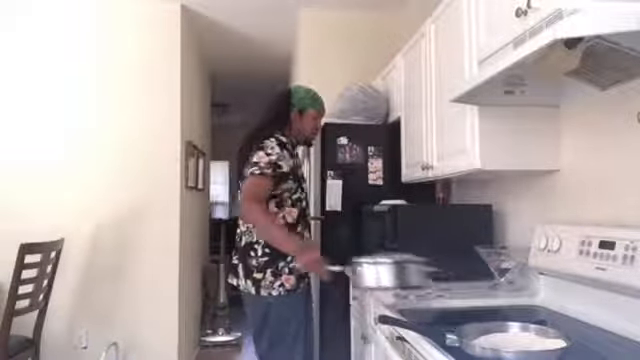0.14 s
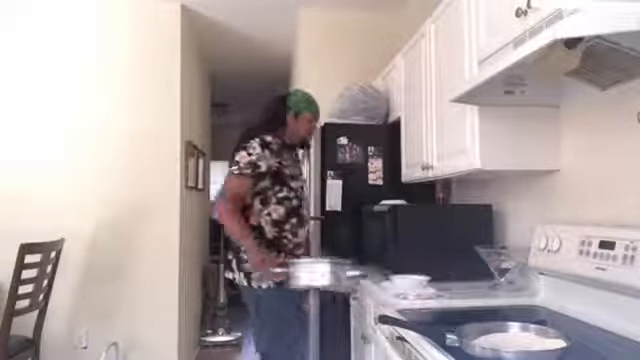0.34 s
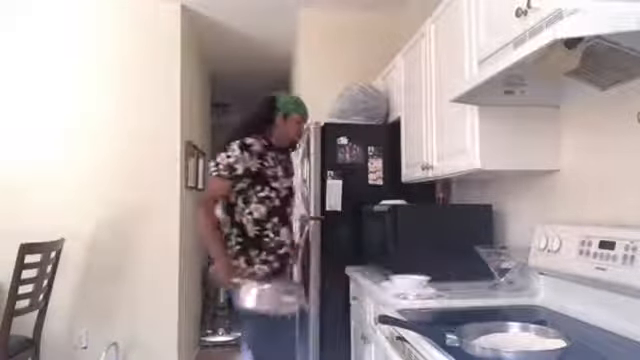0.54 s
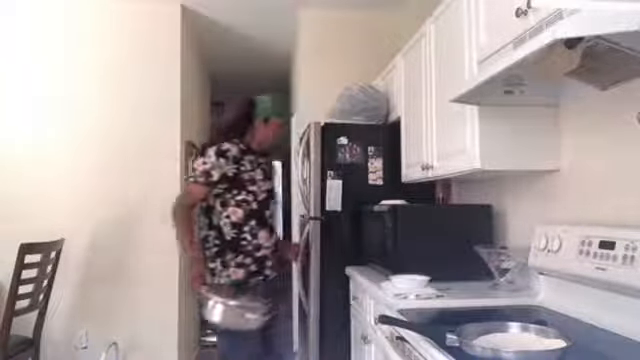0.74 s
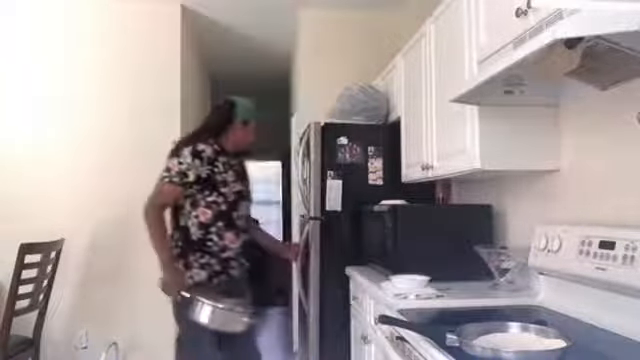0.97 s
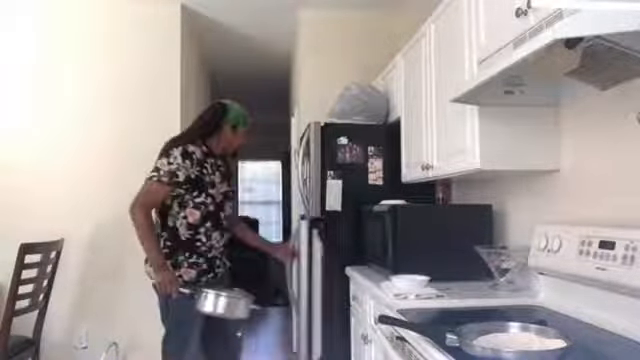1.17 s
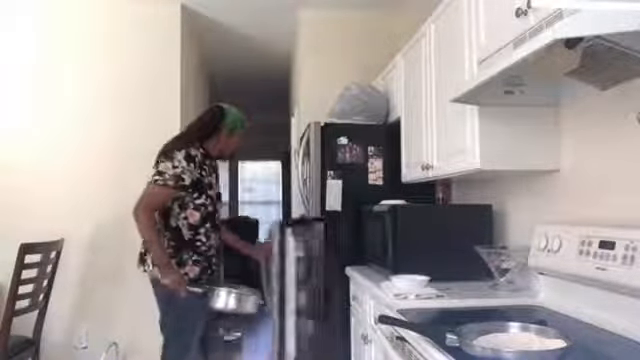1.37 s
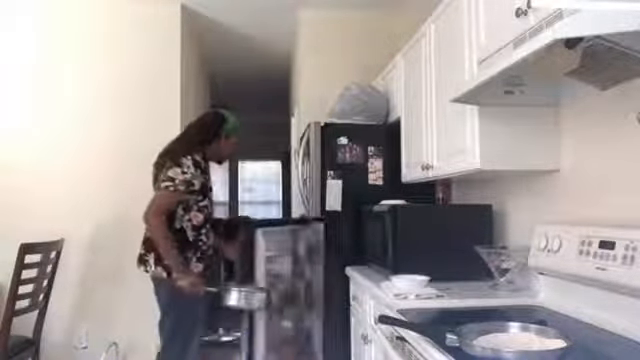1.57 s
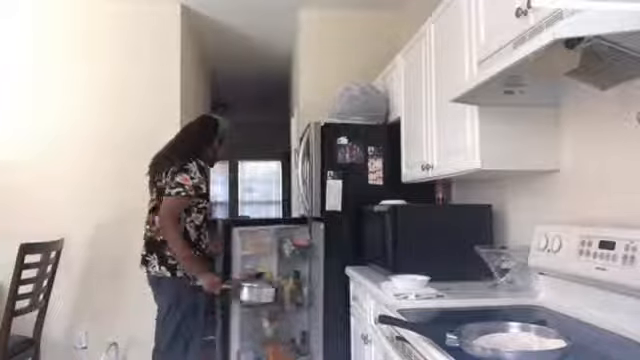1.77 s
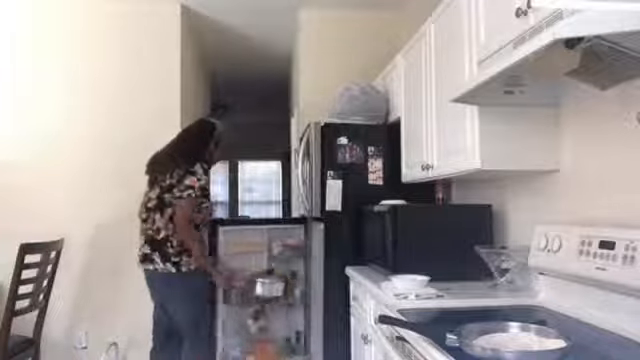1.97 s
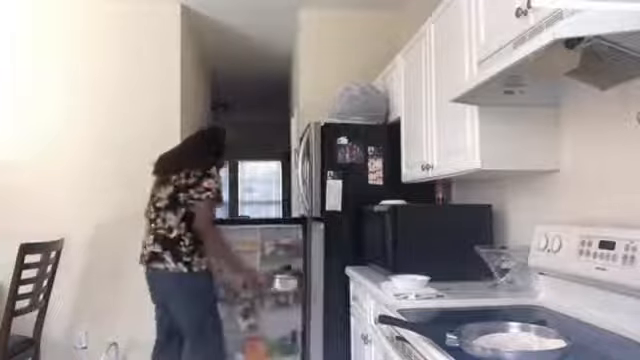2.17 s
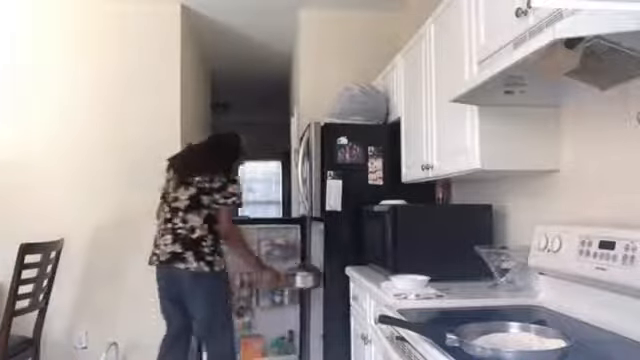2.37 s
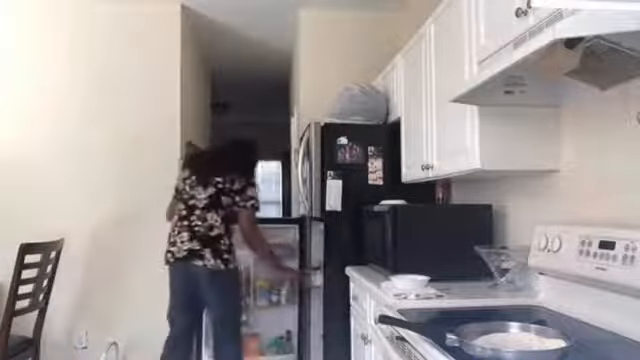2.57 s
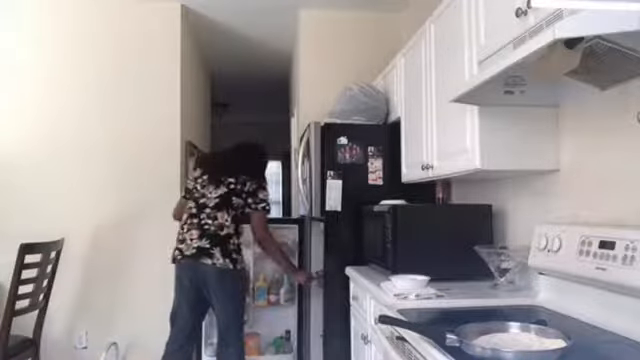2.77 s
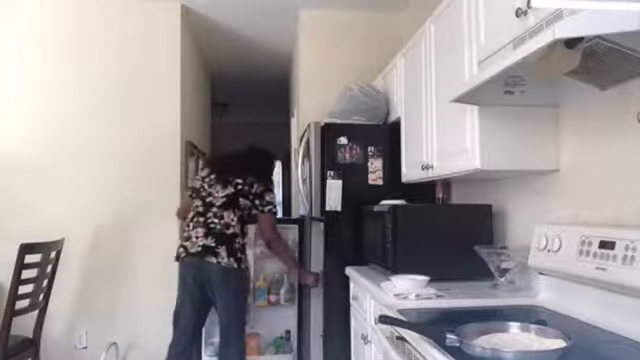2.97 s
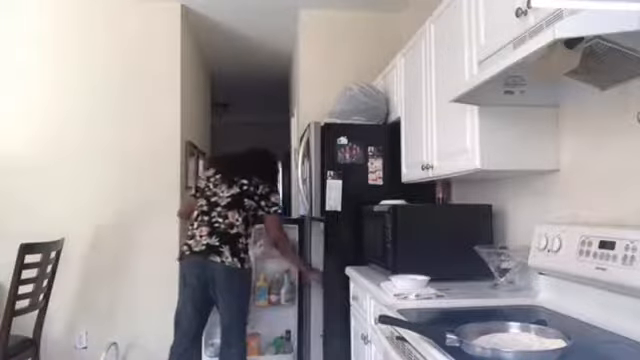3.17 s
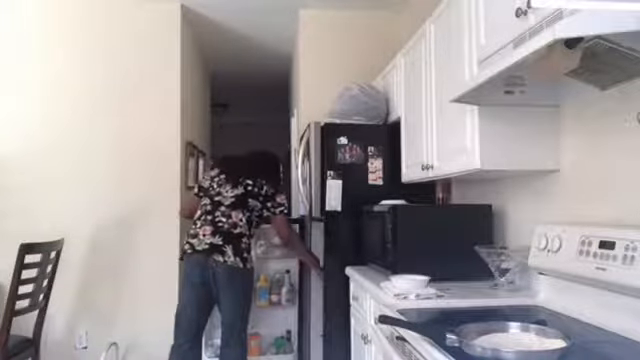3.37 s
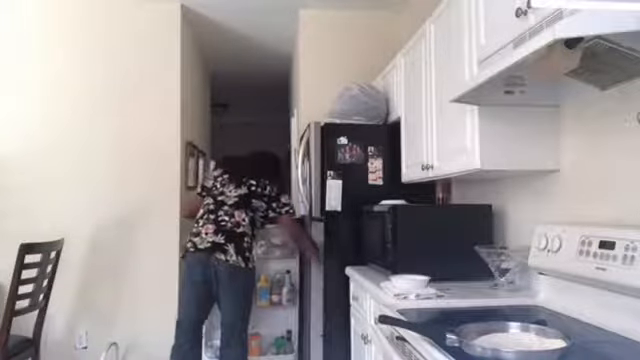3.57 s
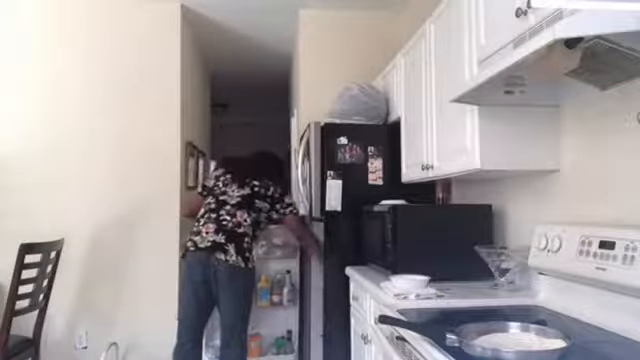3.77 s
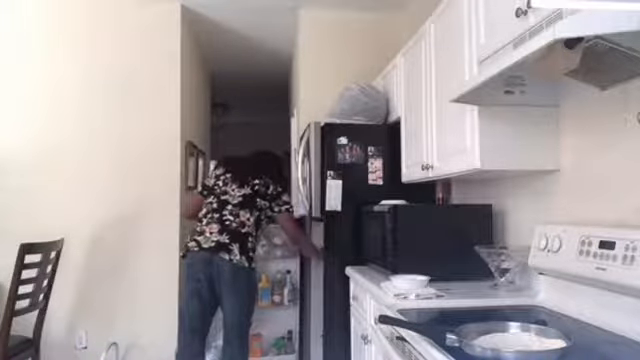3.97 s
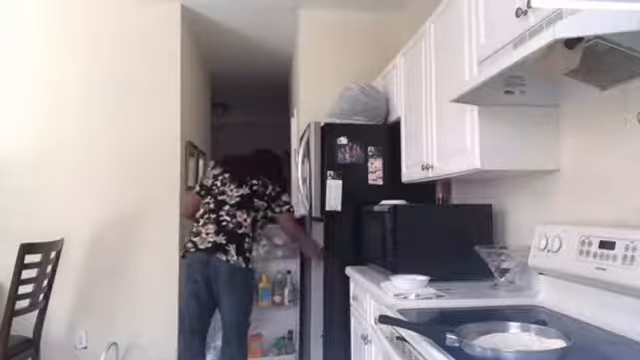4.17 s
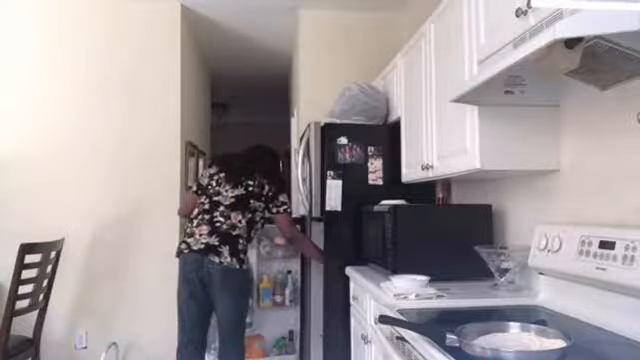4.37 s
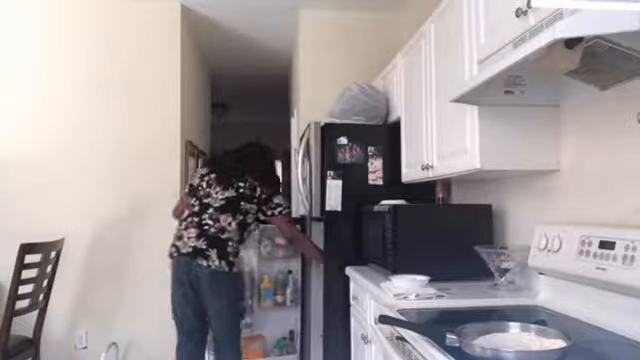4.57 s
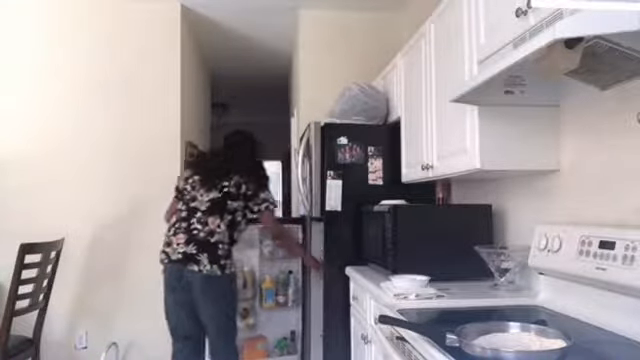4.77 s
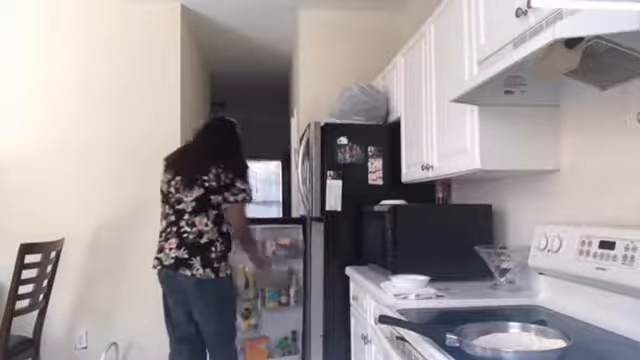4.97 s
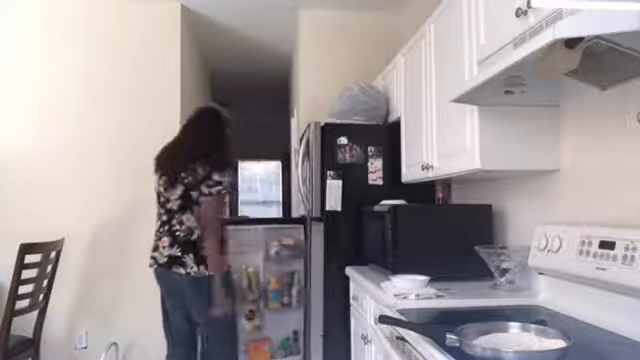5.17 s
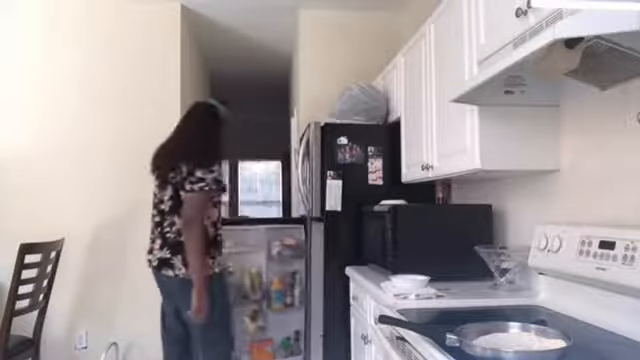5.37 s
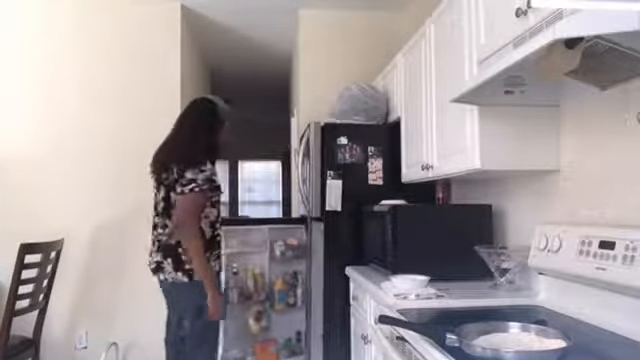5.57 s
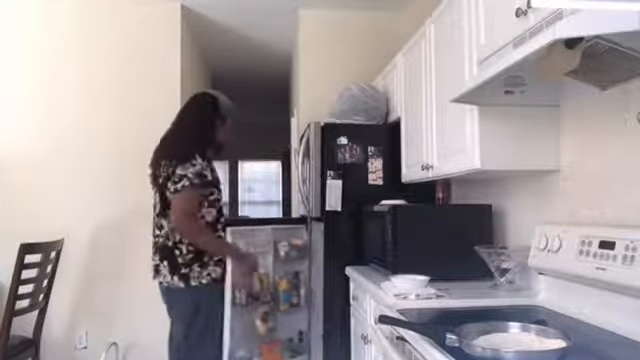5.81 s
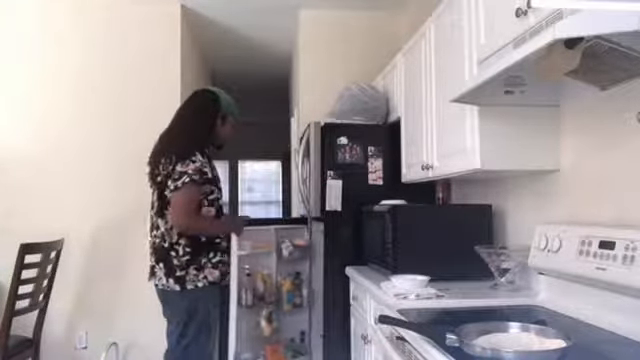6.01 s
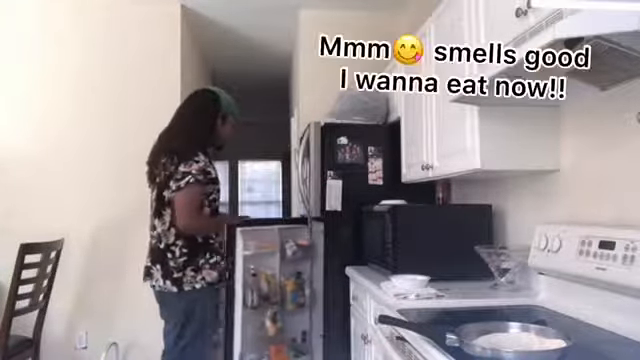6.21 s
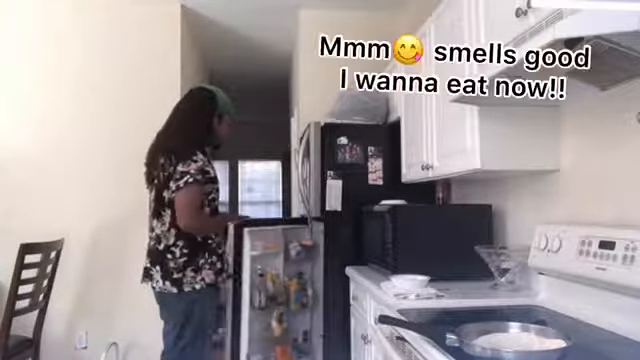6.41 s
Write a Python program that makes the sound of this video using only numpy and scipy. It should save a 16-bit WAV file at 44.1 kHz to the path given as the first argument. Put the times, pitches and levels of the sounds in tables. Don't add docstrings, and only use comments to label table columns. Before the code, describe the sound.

A lively home kitchen opening onto a hallway, heard by one fixed microphone at some distance. A quiet, low fridge hum slowly beats over soft fan noise and faint hiss throughout. From 0 to 1 s slippers scuff, with soft treads near 0.4 and 0.8-0.9. At about 1.1 s the fridge door pops off its seal in a tight run of snaps with a dull panel thump. Gritty shuffles follow from 1.2 to 2.3 s, with a step near 2.05 and a small dry tick at 2.8. From 3.46 to 3.65 s a metal pot knocks a shelf, hollow with short rim raps, then rocks in softer touches until 3.8, with a low boom. A step and scuff come near 4.4. At 4.67 s a glass lid lands with a loud bright clink, clinks again at 4.76 and shivers to rest. Shuffling resumes around 5.1-5.7 s, then a light step at 5.9 and fading scuffs.

```python
import sys
import numpy as np
from scipy import signal
from scipy.fft import rfft, irfft, next_fast_len
from scipy.io import wavfile
from scipy.ndimage import uniform_filter1d, map_coordinates

SR = 44100
rng = np.random.default_rng(int(sys.argv[2]) if len(sys.argv) > 2 else 0)


def natural_amplitude(level_db):
    exponent = np.asarray(level_db, float) / 20
    return 10 ** exponent


def digitize_waveform(pressure):
    field = np.atleast_2d(pressure).T
    bounded = np.clip(field, -1, 1)
    quanta = np.round(bounded * 32767).astype(np.int16)
    wavfile.write(sys.argv[1], SR, quanta)


N = 284174


def unit(x):
    return x / np.sqrt(np.mean(x ** 2) + 1e-20)


def along(points, hz):
    f, v = np.transpose(points)
    return np.interp(np.log(hz + 1), np.log(f + 1), v)


def wobble(rate):
    coarse = np.arange(0, N + 16, 16)
    knots = rng.standard_normal(int(N * rate / SR) + 4)
    curve = map_coordinates(knots, [coarse * rate / SR])
    return np.interp(np.arange(N), coarse, curve)


def soft_step(t, at):
    return 1 / (1 + np.exp(np.clip((at - t) / 0.0012, -50, 50)))


def coloured(x, points, tilt_db=0):
    m = next_fast_len(len(x) + 8192)
    hz = np.fft.rfftfreq(m, 1 / SR)
    gain = natural_amplitude(along(points, hz) + tilt_db * np.log2((hz + 20) / 1000))
    return unit(irfft(rfft(x, m) * gain, m)[:len(x)])


def patchy(depth_db, size, wide, long):
    z = signal.stft(rng.standard_normal(N), nperseg=size)[2]
    field = rng.standard_normal(z.shape)
    field = uniform_filter1d(field, wide, 0)
    field = uniform_filter1d(field, long, 1)
    return signal.istft(z * natural_amplitude(depth_db * unit(field)), nperseg=size)[1][:N]


# f/Hz, t60/s
KITCHEN_T60 = [(100, 0.5), (500, 0.64), (2000, 0.52), (6000, 0.46), (14000, 0.17)]
# f/Hz, level/dB
HALL_LEVEL = [(300, -23), (1000, -16), (3000, -14.5)]


def in_room(x, wet_db):
    hall_longer = 2.77
    hz, t, z = signal.stft(rng.standard_normal(SR * 3 // 5), SR, nperseg=256)
    t60 = along(KITCHEN_T60, hz)[:, None]
    kitchen = natural_amplitude(-60 * t / t60)
    hall = natural_amplitude(along(HALL_LEVEL, hz)[:, None] - 60 * t / (hall_longer * t60))
    tail = signal.istft(z * (kitchen + hall), SR, nperseg=256)[1]
    delayed = np.pad(x, (220, 0))
    wet = signal.fftconvolve(delayed, tail / np.linalg.norm(tail))
    return np.pad(x, (0, len(wet) - len(x))) + natural_amplitude(wet_db) * wet


def add(track, s, x):
    part = track[round(s * SR):][:len(x)]
    part += x[:len(part)]


def ring(modes, t, scatter_db):
    total = 0
    for hz, db, t60 in modes:
        envelope = natural_amplitude(db + scatter_db * rng.normal() - 60 * t / t60)
        total = total + envelope * np.sin(2 * np.pi * hz * t)
    return total


def knocks(contacts, body, modes, wet_db, attack):
    track = np.zeros(N)
    t = np.arange(SR // 3) / SR
    for s, db, tilt_db, t60, ring_db in contacts:
        burst = coloured(rng.standard_normal(len(t)), body, tilt_db) * natural_amplitude(-60 * t / t60)
        blow = burst + natural_amplitude(ring_db) * ring(modes, t, 2.3)
        blow = blow * (1 - np.exp(-t / attack))
        add(track, s, in_room(natural_amplitude(db - 4.5) * blow, wet_db))
    return track


# f/Hz, level/dB per Hz
AIR_SPECTRUM = [(20, -61), (40, -16), (80, -4), (150, -3), (350, -6), (470, -10.5), (880, -17),
                (1300, -19.5), (2200, -27), (3500, -36), (7000, -38.5), (11000, -51.5), (15700, -53)]
# f/Hz, f/Hz, level/dB rms each, t/s of a cancellation
BEATING_PAIRS = [
    (117.55, 120.03, -53.2, 3.35),
    (56.76, 59.3, -68, 3.21),
]
# f/Hz, level/dB rms
MOTOR_TONES = [(75.7, -77), (113.5, -63.5), (116, -88), (136.45, -63), (177.5, -65), (296.55, -64.5),
               (355.8, -64), (592.2, -76.5), (764.4, -69.5), (882.9, -79), (969, -72.5), (3348, -81.5),
               (4298, -83), (5464, -87.5)]


def fridge():
    t = np.arange(N) / SR
    tones = np.zeros(N)
    for a, b, db, null in BEATING_PAIRS:
        first = np.sin(2 * np.pi * a * (t - null))
        second = np.sin(2 * np.pi * b * (t - null))
        tones += natural_amplitude(db) * (first - second)
    for hz, db in MOTOR_TONES:
        level = natural_amplitude(db + 1.4 * wobble(3))
        tones += level * np.sin(2 * np.pi * hz * t + 0.4 * wobble(3))
    fan = coloured(patchy(1.2, size=512, wide=6, long=8), AIR_SPECTRUM)
    return np.sqrt(2) * tones + natural_amplitude(-53 + 0.88 * wobble(3.33)) * fan


# f/Hz, level/dB
SOLE_LOW_COLOUR = [(500, -48), (1000, -9.5), (1600, 0), (2100, 0), (2700, -2.5), (3500, -9.5), (5000, -16),
                   (8000, -33), (15700, -38)]
SOLE_HIGH_COLOUR = [(500, -29), (1200, -4), (2300, -4.5), (3500, 2.5), (5000, -4), (7000, -15),
                    (15700, -48.5)]
FIZZ_COLOUR = [(4000, -24), (7000, 2.5), (11000, -7.5), (15700, -10)]
DRAG_T60 = (.55, 0.51, 0.38)
# t/s, length/s, peak level/dB, pitch from low 0 to high 1, fizz level/dB
SOLE_DRAGS = [(0.0, 0.3, -59.5, 0.5, -7.5), (0.376, 0.14, -45, 0.32, -23), (.5, 0.32, -64.5, 0.5, -12),
              (0.792, 0.058, -54, 0.66, -25), (0.862, 0.075, -50.5, .7, -18), (0.917, .2, -55.5, 0.34, -14),
              (1.197, 0.28, -46, 0.27, -27.5), (1.447, 0.11, -44, 0.33, -32),
              (1.494, .21, -48.5, 0.17, -23), (1.81, 0.056, -67, 0.6, -15), (2.03, 0.18, -48.5, 0.5, -18.5),
              (2.108, .25, -52, 0.57, -15), (2.765, 0.098, -62, 0.5, -20), (2.8, 0.43, -66, 0.62, -19),
              (4.319, 0.14, -58.5, 0.53, -19), (4.439, 0.49, -52.5, 0.36, -18),
              (5.078, 0.23, -51, 0.62, -18), (5.187, .18, -48.5, 0.37, -19), (5.353, 0.26, -45.5, 0.4, -26),
              (5.522, .17, -46.5, 0.31, -26), (5.872, 0.15, -61.5, .45, -14.5),
              (5.954, 0.25, -59.5, 0.52, -18.5), (6.24, 0.11, -74, .4, -18)]


def slippers():
    rest_db, rest_fizz_db = -73.5, -14
    skew, roundness = 0.75, 1.34
    late = 0.59
    t = np.arange(N) / SR
    power = np.ones((3, N)) * natural_amplitude([[rest_db], [rest_db], [rest_db + rest_fizz_db]]) ** 2
    for s, length, db, pitch, fizz_db in SOLE_DRAGS:
        progress = np.clip((t - s) / length, 0, 1)
        speed = np.sin(np.pi * progress ** skew).clip(0) ** roundness
        turn = pitch * np.pi / 2
        mix = np.array([[np.cos(turn)], [np.sin(turn)], [natural_amplitude(fizz_db)]])
        power += (natural_amplitude(db) * speed * mix) ** 2
    track = np.zeros(N)
    colours = (SOLE_LOW_COLOUR, SOLE_HIGH_COLOUR, FIZZ_COLOUR)
    for now, t60, colour in zip(power, DRAG_T60, colours):
        keep = natural_amplitude(-60 / (t60 * SR)) ** 2
        lingering = signal.lfilter([1 - keep], [1, -keep], now)
        heard = (1 - late) * now + late * lingering
        grit = patchy(3.5, size=1024, wide=3, long=5) * natural_amplitude(1.2 * wobble(300))
        track += np.sqrt(np.abs(heard)) * coloured(grit, colour)
    return natural_amplitude(wobble(25)) * track


# t/s, peak level/dB
STEPS = [(.363, -44.5), (.8, -45.5), (.88, -40), (2.057, -42.5), (4.37, -41.5), (5.905, -48.5)]
# f/Hz, level/dB
FLOOR_COLOUR = [(100, -22), (250, -2.5), (500, -1.5), (1000, -3), (2000, -21.5), (15700, -59)]


def footfalls():
    contacts = [(s, db, 0.2, 0.1, -60) for s, db in STEPS]
    return knocks(contacts, FLOOR_COLOUR, [], wet_db=-0.5, attack=0.0044)


# t/s, peak level/dB, tilt/dB per octave, burst t60/s
DULL_CONTACTS = [(.393, -61, -6.8, .05), (.798, -41, -10.5, 0.055), (.87, -42.5, -4.1, 0.067),
                 (1.469, -46, -9.5, 0.051), (1.823, -51, 0, 0.018), (2.051, -48, -9, .06),
                 (2.3, -51, 5, 0.033), (2.772, -35, 1, 0.01), (4.39, -51.5, -4, 0.081),
                 (6.11, -57, -5, .03)]
# f/Hz, level/dB
DULL_COLOUR = [(500, -35), (1200, 7), (3000, 8.5), (8000, 2), (15700, -19)]


def ticks():
    contacts = [(*row, -60) for row in DULL_CONTACTS]
    return knocks(contacts, DULL_COLOUR, [], wet_db=0.5, attack=0.0004)


# t/s, level/dB, f/Hz, length/s
AIR_PUSHES = [
    (1.14, -55, 40, .06),
    (3.66, -46, 82, .055),
]


def air_pushes():
    track = np.zeros(N)
    for s, db, hz, length in AIR_PUSHES:
        u = np.clip(np.arange(N) / SR - s, 0, None)
        swell = u / length * np.exp(-u / length)
        track += natural_amplitude(db + 9) * swell * np.sin(2 * np.pi * hz * u)
    return track


# t/s, peak level/dB, tilt/dB per octave, burst t60/s, ring level/dB
DOOR_CONTACTS = [(1.07, -42, -1, 0.081, -23), (1.091, -33, 1, 0.036, -31), (1.1, -30, -0.5, 0.1, -28),
                 (1.119, -23, 4, 0.038, -8), (1.128, -26.5, -1.2, 0.063, -14), (1.15, -31, -7, 0.095, -25),
                 (1.25, -37, -3, 0.15, -19)]
# f/Hz, level/dB per Hz
DOOR_COLOUR = [(40, -16), (110, 0), (350, 1.5), (600, -7.5), (1200, -2), (2300, -11), (4500, -15),
               (8000, -20.5), (15700, -34)]
# f/Hz, level/dB, t60/s
DOOR_RING = [(564, 6, 0.058), (982, -0.5, 0.27), (1511, 6.5, 0.065), (2260, -14, .08), (4510, -10, 0.042)]


def door():
    return knocks(DOOR_CONTACTS, DOOR_COLOUR, DOOR_RING, wet_db=-3.5, attack=0.00046)


# t/s, level/dB
RIM_RAPS = [(3.459, -29), (3.589, -29), (3.6, -22.5), (3.646, -36)]
# f/Hz, level/dB, t60/s
RIM_RING = [(1135, 0, 0.043), (1287, -7, 0.038), (1694, -8.5, 0.034)]


def rim():
    track = np.zeros(N)
    t = np.arange(SR // 8) / SR
    for s, db in RIM_RAPS:
        rap = (1 - np.exp(-t / 0.00086)) * ring(RIM_RING, t, 1.6)
        add(track, s, in_room(natural_amplitude(db) * rap, wet_db=-5.5))
    return track


def settling():
    first_s, gap_s = 3.684, 0.044
    level_db, loss_db = -22.5, 3.0
    tilt_db, dulls_db = 3.0, 1
    return [(first_s + k * gap_s, level_db - k * loss_db, tilt_db - k * dulls_db, 0.1, -13.5)
            for k in range(4)]


# t/s, peak level/dB, tilt/dB per octave, burst t60/s, ring level/dB
POT_CONTACTS = [(3.459, -27.5, -1.5, 0.053, -13), (3.469, -29, -1.5, 0.056, -5.5),
                (3.493, -28.5, -2, 0.06, -9), (3.528, -34.5, -1, 0.074, -8),
                (3.587, -25.5, 1.5, 0.052, -14), (3.594, -21, 2.5, 0.075, -2.5),
                (3.622, -24, 1.6, 0.071, -3), (3.644, -16.5, 3, 0.069, -8.5)]
# f/Hz, level/dB per Hz
POT_COLOUR = [(50, -38), (100, -14), (250, -4.5), (500, -5), (1100, -13), (1800, -18.5), (4300, -26),
              (8000, -41.5), (15700, -57)]
# f/Hz, level/dB, t60/s
POT_RING = [(144, -7, .25), (232, 0, .3), (268, 0, .3), (377, -8, .2), (490, -6, .2), (590, -9, .15),
            (795, -8, .15), (931, -11, .15)]


def pot():
    blows = knocks(POT_CONTACTS, POT_COLOUR, POT_RING, wet_db=-1.5, attack=0.0019)
    return blows + knocks(settling(), POT_COLOUR, POT_RING, wet_db=-3.0, attack=0.008)


# t/s, peak level/dB, tilt/dB per octave, burst t60/s, ring level/dB
LID_CONTACTS = [(4.664, -22, 3, 0.099, -44), (4.668, -22.5, 3.5, 0.066, -13), (4.674, -18, 0, 0.098, -7.5),
                (4.7, -26.5, -5, 0.088, -5), (4.756, -34, 2, 0.043, -24), (4.798, -24.5, -2.2, 0.078, -24),
                (4.845, -37.5, -1, 0.077, -8)]
# f/Hz, level/dB per Hz
LID_COLOUR = [(60, -32.5), (150, -0.5), (400, -1), (1000, 0), (2500, -12.5), (4000, -12.5), (7000, -23.5),
              (15700, -38.5)]
# f/Hz, level/dB, t60/s
SHELF_RING = [(148, 0, .15), (168, -2, .15), (235, -4, .2), (356, -2, .2), (931, -7, .15), (1244, -8, .1)]


def lid_landing():
    return knocks(LID_CONTACTS, LID_COLOUR, SHELF_RING, wet_db=-1.5, attack=0.002)


# f/Hz, level/dB, t60/s
GLASS_MODES = [(1825, 0, 1.15), (1757, -9, 1.1), (3704, -25, .3), (3768, -19, .12), (3893, -21, .3),
               (5448, -32, .2), (6770, -22, .5)]
# t/s, level/dB, free ring/s, damping level/dB, time to the stop/s
GLASS_CLINKS = [
    (4.667, -12.5, .027, -12, .073),
    (4.746, -28, .008, -5, .011),
    (4.757, -19, .008, -8, .028),
    (4.946, -41, .012, -6, .02),
]
# t/s, level/dB, level changes a second, unevenness/dB, t60/s of the added loss
GLASS_LAST_RING = (4.775, -32, 140, 3.5, 0.5)


def glass():
    track = np.zeros(N)
    t = np.arange(SR // 2) / SR
    for s, db, free, damped_db, stop in GLASS_CLINKS:
        level = natural_amplitude(db + damped_db * soft_step(t, free))
        swing = (1 - np.exp(-t / 0.001)) * level * (1 - soft_step(t, stop))
        add(track, s, in_room(swing * ring(GLASS_MODES, t, 0.4), wet_db=-14))
    s, db, rate, uneven_db, t60 = GLASS_LAST_RING
    uneven_level = natural_amplitude(db + uneven_db * wobble(rate)[:len(t)] - 60 * t / t60) * soft_step(t, 0.0074)
    add(track, s, in_room(uneven_level * ring(GLASS_MODES, t, 0.99), wet_db=-3.5))
    return track


def scene():
    background = fridge() + slippers() + footfalls() + ticks()
    opening = air_pushes() + door()
    setting_down = rim() + pot() + lid_landing() + glass()
    return (background + opening + setting_down)[None]


def top_cut(x):
    return signal.sosfilt(signal.butter(12, 16160, fs=SR, output="sos"), x)


# f/Hz, level/dB
HISS_COLOUR = [(3000, -20), (8000, -.5), (12000, -.5), (15700, -3)]
# lower f/Hz, upper f/Hz
MIC_BAND = (36, 15800)


def record(dry):
    low_hz, top_hz = MIC_BAND
    hiss = natural_amplitude(-86) * coloured(rng.standard_normal(N), HISS_COLOUR)
    bass_cut = signal.butter(3, low_hz, "highpass", fs=SR, output="sos")
    spectrum = rfft(signal.sosfilt(bass_cut, dry + hiss))
    mix = irfft(spectrum * (np.fft.rfftfreq(N, 1 / SR) < top_hz), N)
    return top_cut(mix)


dry = scene()
out = record(dry)
digitize_waveform(out)
```